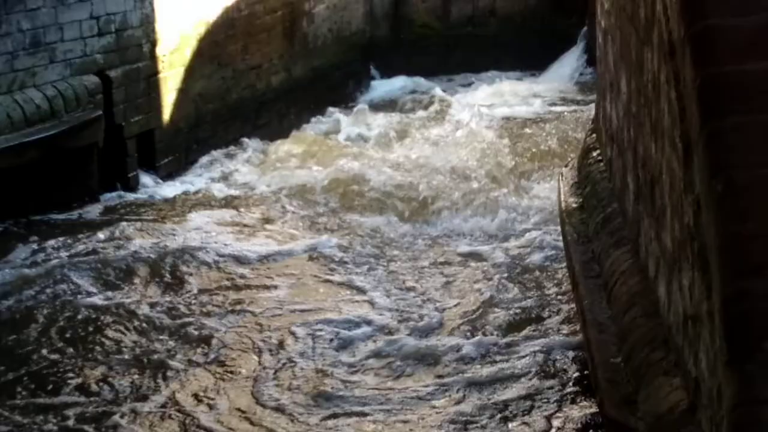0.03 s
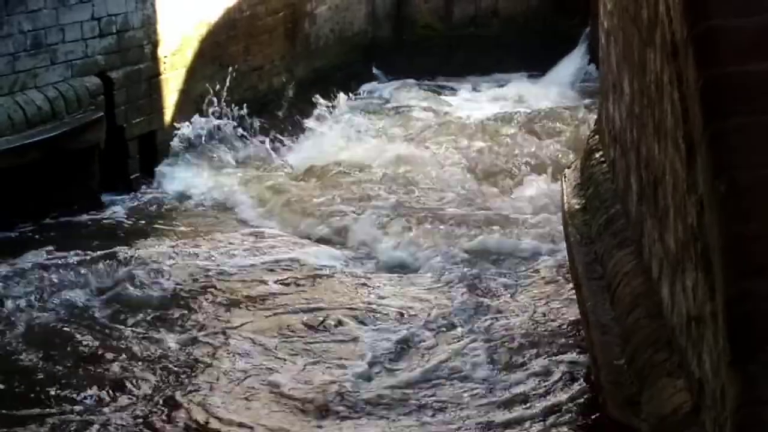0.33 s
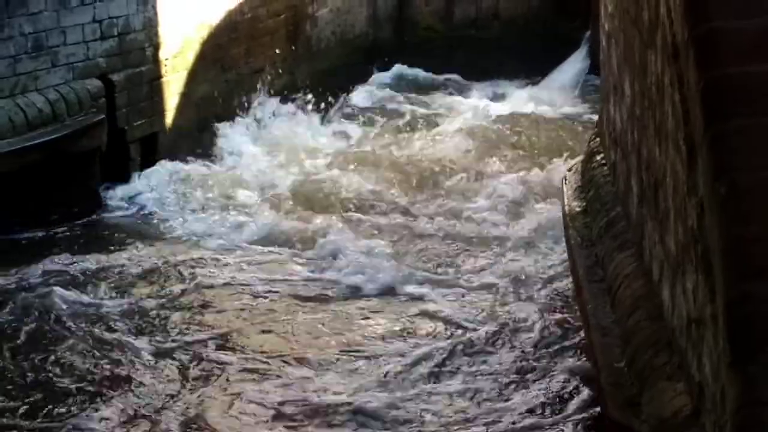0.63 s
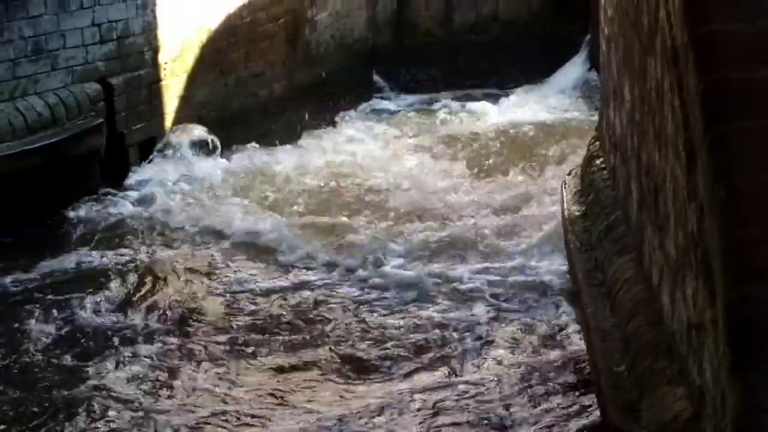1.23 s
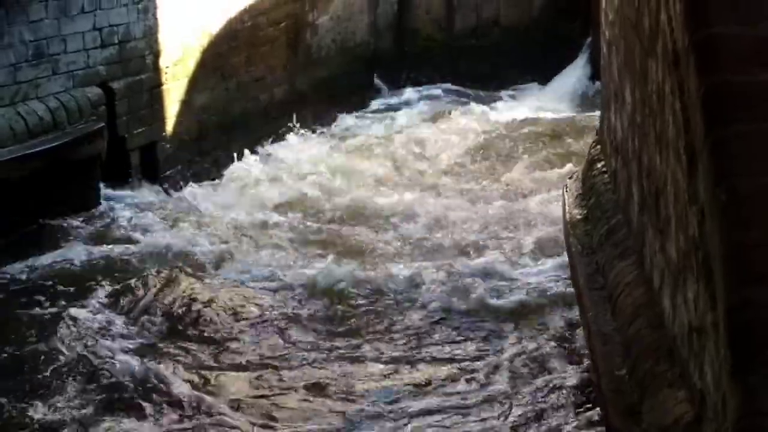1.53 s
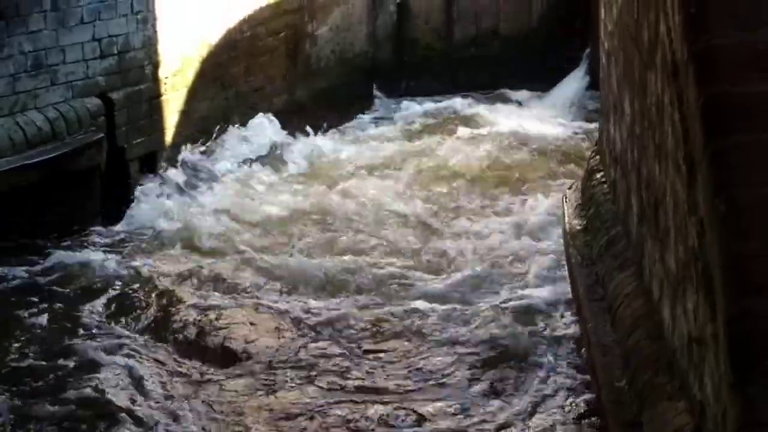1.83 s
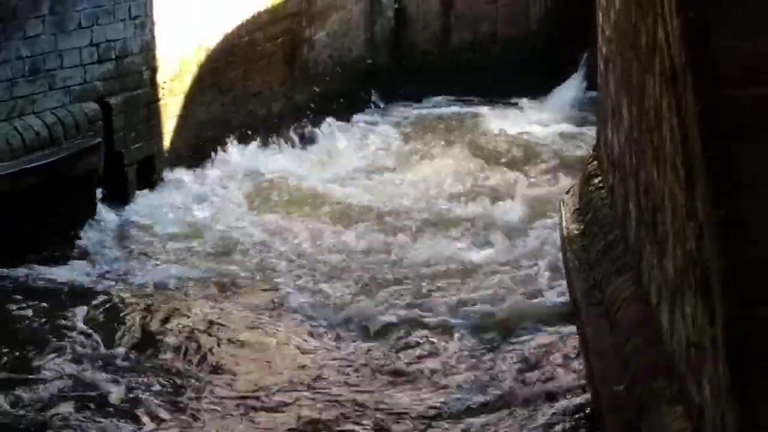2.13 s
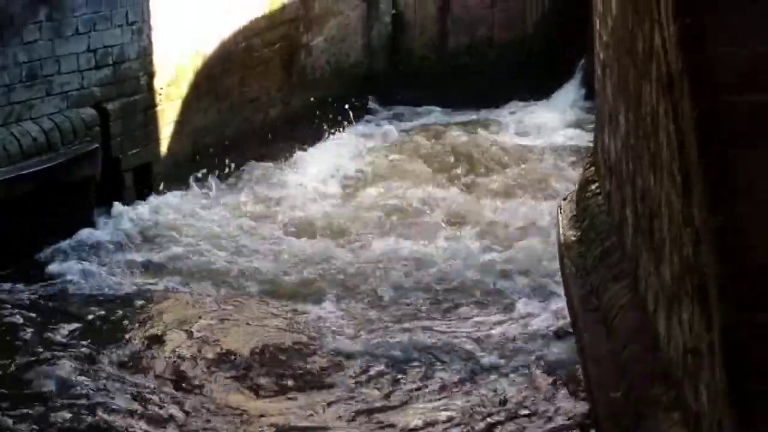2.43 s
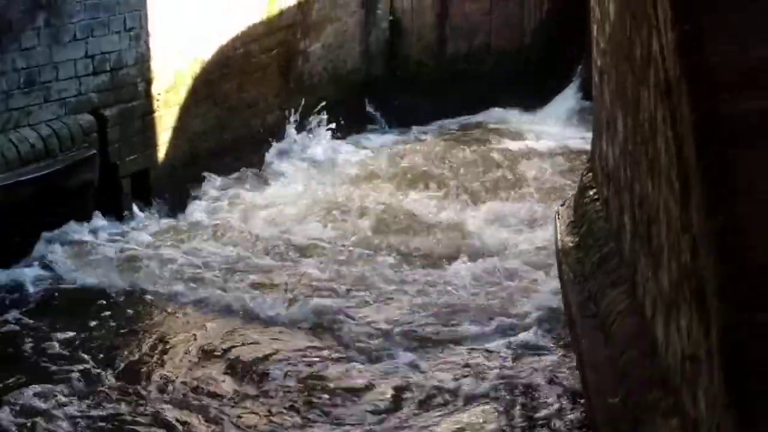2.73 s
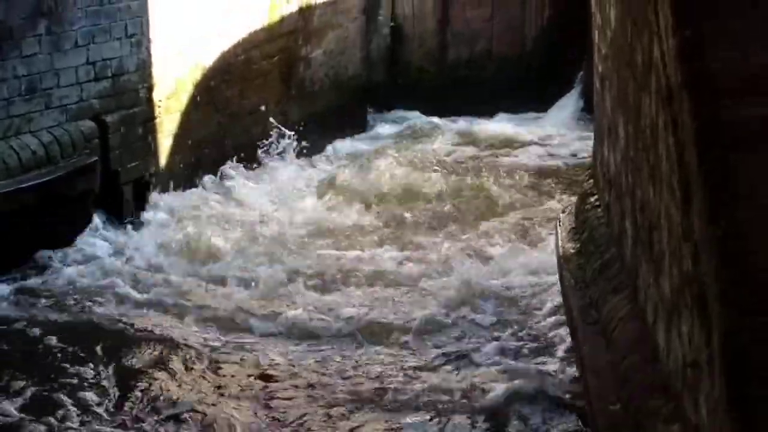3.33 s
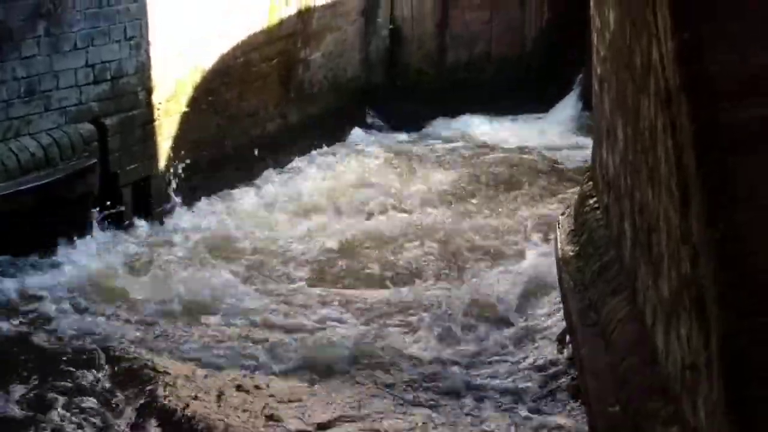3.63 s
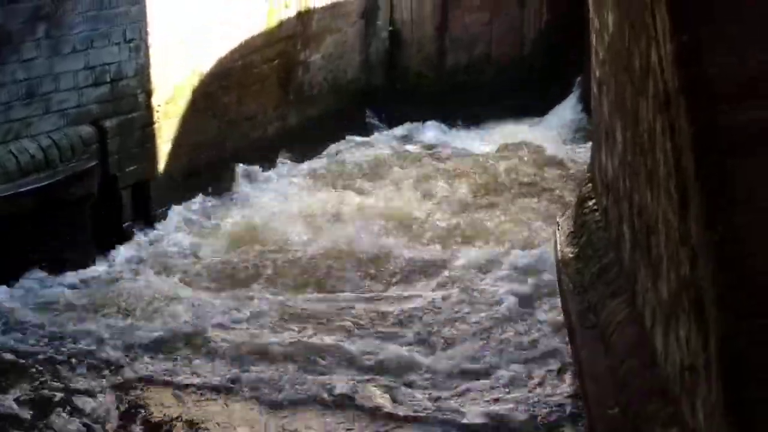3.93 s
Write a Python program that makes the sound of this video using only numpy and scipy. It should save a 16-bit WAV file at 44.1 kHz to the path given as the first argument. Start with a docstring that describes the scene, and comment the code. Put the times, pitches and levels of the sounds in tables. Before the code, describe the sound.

Turbulent water churns and roars steadily between narrow canal walls, gurgling and splashing.

```python
"""White water in a brick channel

Water surges steadily between narrow canal walls: a churning roar with ringing bubbles, a hollow boom,
gulps of swallowed air and spray from collapsing crests, over a faint low hum. The sound fades in.
Near the end a soft knock thuds in the widely spread pair of microphones."""
import sys
import numpy as np
from scipy import signal
from scipy.fft import rfft, irfft
from scipy.io import wavfile
from scipy.ndimage import uniform_filter1d

SR = 44100
rng = np.random.default_rng(int(sys.argv[2]) if len(sys.argv) > 2 else 0)


def output_pcm(signal):
    """Save a mono or channel-first signal as 16-bit PCM at the path in sys.argv[1].

    Samples are clipped to [-1, 1] before scaling.
    """
    pcm = np.clip(np.atleast_2d(signal).T, -1, 1) * 32767
    wavfile.write(sys.argv[1], SR, np.round(pcm).astype(np.int16))


N = 176400
T, HZ = np.arange(N) / SR, np.fft.rfftfreq(N, 1 / SR)

# water spectrum: f/Hz, relative density/dB, left minus right/dB
WATER_SPECTRUM = [(25, -82, -1.5), (36, -77, -0.7), (55, -71, -2.9), (90, -64.5, -14), (125, -63.5, 5),
                  (162, -53.5, -2.5), (243, -51, 0), (310, -53, -2), (457, -51, 0), (475, -51, 1),
                  (586, -52, 0), (764, -51, 0), (947, -51.5, 0.3), (1350, -55.5, -2), (1870, -56, -3.5),
                  (2140, -55, -2.5), (3110, -58, -0.2), (4230, -62, -1.5), (4900, -64.5, 2),
                  (5400, -65.5, -3.5), (5760, -67, 5), (6470, -64.5, -4.5), (7450, -66.5, 0.7),
                  (9700, -69, -2.5), (11270, -62.5, -3), (12700, -64, -6.5), (14000, -69.5, -2)]
# surge of the deep rumble: t/s, relative level/dB
RUMBLE_SURGE = [(.15, -29.5), (.48, -27.5), (.62, -26), (.74, -23), (.8, -27.5), (1.25, -32), (1.4, -24.5),
                (1.55, -30), (1.82, -28), (1.98, -26.5), (2.13, -25.5), (2.43, -25.5), (2.54, -27),
                (2.65, -26), (2.72, -26), (3.0, -26), (3.16, -28), (3.32, -29), (3.45, -29), (3.66, -25.5),
                (3.78, -27), (3.99, -25.5)]
# surge of the churn: t/s, relative level/dB
CHURN_SURGE = [(.35, -22), (.43, -23), (.65, -19.5), (.72, -20.5), (.77, -23.5), (.93, -22), (1.04, -22),
               (1.25, -21), (1.3, -23.5), (1.47, -19.8), (1.6, -21.5), (1.66, -24.5), (1.72, -21),
               (1.8, -23), (1.89, -21.5), (2.15, -21.5), (2.27, -21.5), (2.44, -23.5), (2.53, -21.5),
               (2.9, -20.5), (3.1, -21.5), (3.22, -23.5), (3.3, -22), (3.49, -23), (3.57, -22.5),
               (3.67, -22.5), (3.72, -23), (3.9, -22), (3.99, -20.5)]
# surge of the spray hiss: t/s, relative level/dB
SPRAY_SURGE = [(.35, -23), (.5, -21), (.66, -20), (.73, -21.5), (.77, -23.5), (1.05, -23.5), (1.24, -21),
               (1.31, -23.4), (1.42, -21.6), (1.58, -22), (1.79, -23), (2.0, -22), (2.2, -22), (2.72, -22),
               (2.81, -22.5), (2.92, -21), (3.22, -23), (3.29, -20.9), (3.52, -22), (3.6, -22), (3.7, -22),
               (3.85, -24.5), (3.95, -21.5), (3.99, -22)]
# surge of the boom between the walls: t/s, relative level/dB
BOOM_SURGE = [(.4, -30), (.8, -31), (1.02, -26.5), (1.28, -31.5), (1.45, -29), (2.1, -26), (2.42, -27),
              (2.9, -27.5), (3.3, -29), (3.55, -35.5), (3.95, -28)]
# likeness of the channels: f/Hz, depth/0..1, lean to one half of the water/-1..1
STEREO_LIKENESS = [(50, 0, 0.27), (120, 0.9, -0.28), (204, 0.7, 0.31), (248, 0.92, 0.18),
                   (308, 0.06, 0.091), (360, 0.6, -0.43), (600, 0.85, 0.49), (730, 0.78, 0.048),
                   (1020, 0.97, 0.27), (2364, 0.99, 0.68), (2880, 0.53, 0.48), (3360, 0.96, 0.44),
                   (4120, 0.2, -0.6), (4420, 0.93, -0.49), (4670, 1, -0.6), (4800, 1, -.5),
                   (5800, 0.85, -0.31), (7060, 0.83, 0.012), (7900, 0.4, -0.31), (10500, 0.3, .25),
                   (14000, 0, .35)]
# hum tones: f/Hz, level/dB, phase lead of left/rad
HUM_TONES = [(69.5, -51.5, 1), (104.6, -46.5, 1.36)]
# swallowed air pockets: peak t/s, starting f/Hz, peak level/dB
AIR_POCKETS = [(.651, 883, -19), (.705, 574, -22), (0.73, 202, -27), (0.737, 261, -28), (1.42, 1244, -25),
               (1.448, 648, -20.5), (1.682, 540, -17.5), (1.745, 568, -20.5), (1.902, 629, -19.5),
               (1.904, 887, -23), (1.989, 744, -23), (2.054, 609, -19.5), (2.069, 158, -20.5),
               (2.124, 274, -21), (2.136, 206, -27), (2.188, 166, -26), (2.226, 491, -19),
               (2.535, 248, -24.5), (2.547, 501, -20.5), (2.576, 616, -21.5), (2.689, 236, -25),
               (2.706, 390, -21), (2.768, 1334, -22), (2.887, 519, -18.5), (2.919, 510, -21.5),
               (3.312, 148, -25), (3.655, 590, -21), (3.663, 181, -22), (3.888, 480, -18.5),
               (3.927, 620, -21), (3.957, 270, -25), (3.96, 485, -21)]
# fade-in: t/s, linear gain
FADE_IN = [(.113, 0.012), (.12, 0.088), (.2, 0.3), (.25, 0.51), (.28, 0.72), (.35, 1)]

RUMBLE_TO_CHURN_HZ, CHURN_TO_SPRAY_HZ = (280, 480), (1400, 2800)
BAND_LIMIT_HZ = 14250


def amp(db):
    """Decibels to gain."""
    return 10 ** (np.asarray(db) / 20)


def unit_rms(x):
    """Scales to rms 1."""
    return x / np.sqrt(np.mean(x ** 2) + 1e-20)


def per_bin(table, column=1):
    """Table column at each FFT bin, log-frequency interpolation."""
    columns = np.transpose(table)
    return np.interp(np.log(HZ + 1), np.log(columns[0] + 1), columns[column])


def drift(shape, spans):
    """Smooth random field, rms 1; one smoothing span per axis."""
    field = rng.standard_normal(shape)
    for axis, span in enumerate(spans):
        field = uniform_filter1d(uniform_filter1d(field, span, axis), span, axis)
    return unit_rms(field)


def impulses(per_s, spread_db):
    """Two random trains sharing the rate; a few impulses stand out."""
    hits = rng.random((2, N)) < per_s / 2 / SR
    return hits * amp(spread_db * np.minimum(rng.exponential(1, (2, N)), 4))


def surge_db(t, curve):
    """Level curve about its mean."""
    times_s, db = np.transpose(curve)
    return np.interp(t, times_s, db - db.mean())


def water_colour(x, tilt=1):
    """Applies the water spectrum; rms 1."""
    return unit_rms(irfft(rfft(x) * amp(per_bin(WATER_SPECTRUM)) * tilt * (HZ < BAND_LIMIT_HZ), N))


def wall_echo(x, level_db=-3, t60_s=0.26, delay_s=.006):
    """Adds the short, dense echo between the channel walls."""
    t = T[:SR // 2]
    tail = rng.standard_normal((2, len(t))) * amp(-60 * t / t60_s) * (t > delay_s)
    tail /= np.linalg.norm(tail[0])
    return x + amp(level_db) * signal.fftconvolve(x, tail, axes=1)[:, :N]


def roar(level_db=-20, swell_db=0.34, flicker_db=.5, patch_db=0.75):
    """Turbulent water surges in three bands and churns in patches."""
    hz, t = np.fft.rfftfreq(512, 1 / SR), np.arange(N // 128 + 5) * 128 / SR
    shape = len(t), len(hz)
    churn_hz, spray_hz = CHURN_TO_SPRAY_HZ
    spray = np.clip(np.log((hz + 1) / churn_hz) / np.log(spray_hz / churn_hz), 0, 1)
    rumble = np.interp(hz, RUMBLE_TO_CHURN_HZ, [1, 0])
    bands = [(rumble, RUMBLE_SURGE), (1 - rumble - spray, CHURN_SURGE), (spray, SPRAY_SURGE)]
    db = sum(share * surge_db(t, curve)[:, None] for share, curve in bands)
    db += swell_db * drift((len(t), 1), (14, 1)) + flicker_db * drift(shape, (3, 50))
    db += patch_db * (1 - .5 * spray) * drift(shape, (14, 6))
    frames = (rng.standard_normal((2, *shape)) + 1j * rng.standard_normal((2, *shape))) * amp(db)
    _, noise = signal.istft(frames.transpose(0, 2, 1), nperseg=512, noverlap=384)
    return amp(level_db) * water_colour(noise[:, :N])


def bubbles(level_db=-25.5, per_s=1200, sizes=32, decay_cycles=7, glide=0.041):
    """Bubbles of many sizes ring briefly, rising in pitch."""
    out = np.zeros((2, N))
    for hz in np.linspace(300, 2400, sizes):
        age = T[:SR // 8] * hz * rng.uniform(0.94, 1.05) / decay_cycles  # in decay times
        ring = np.exp(-age) * np.sin(2 * np.pi * decay_cycles * age * (1 + glide * age))
        births = impulses(per_s / sizes, spread_db=2.5)
        out += signal.oaconvolve(births, unit_rms(ring)[None], axes=1)[:, :N]
    return amp(level_db + surge_db(T, CHURN_SURGE)) * water_colour(wall_echo(out))


def hollow_boom(level_db=-29, centre_hz=567.5, width_hz=166, wander_hz=17, swell_db=0.7):
    """The gap between the walls booms; its pitch wanders as the water heaves."""
    lowpass = 1 / (1 + (HZ / width_hz * 2) ** 4)
    heave = amp(swell_db * drift((N,), (1800,)) + surge_db(T, BOOM_SURGE))
    in_phase, quadrature = irfft(rfft(rng.standard_normal((2, 2, N)) * heave) * lowpass, N)
    phase = 2 * np.pi * np.cumsum(centre_hz + wander_hz * drift((N,), (2400,))) / SR
    return amp(level_db) * unit_rms(in_phase * np.cos(phase) + quadrature * np.sin(phase))


def splashes(level_db=-27, crests_per_s=36, drops_per_s=30000, decay_s=0.029, low_cut_hz=790):
    """Each collapsing crest throws a sudden shower of drops that dies away."""
    crest_power = impulses(crests_per_s, spread_db=2.5).sum(0) ** 2
    shower = signal.lfilter([1], [1, -np.exp(-1 / (decay_s * SR))], crest_power)
    shower /= uniform_filter1d(shower, size=14000) + 1e-6  # steady flow feeds the showers evenly
    drops = impulses(drops_per_s, spread_db=1.8) * rng.choice([-1, 1], (2, N)) * np.sqrt(shower)
    highpass = HZ ** 2 / (HZ ** 2 + low_cut_hz ** 2)
    return amp(level_db + surge_db(T, SPRAY_SURGE)) * water_colour(wall_echo(drops), highpass)


def stereo_spread(halves, comb_period_hz=2335):
    """The two halves of the water reach the channels with opposite phase shifts."""
    combed = HZ > comb_period_hz / 2  # here the channels swing in and out of phase along frequency
    comb_rad = 2 * np.pi * HZ / comb_period_hz
    correlation = per_bin(STEREO_LIKENESS) * np.where(combed, -np.cos(comb_rad), 1)
    turn = np.exp(.5j * np.arccos(np.clip(correlation, -1, 1)))
    lean = np.clip(per_bin(STEREO_LIKENESS, column=2) * np.where(combed, np.sin(comb_rad), 1), -1, 1)
    first, second = rfft(halves) * np.sqrt([(1 + lean) / 2, (1 - lean) / 2])
    pan = amp(per_bin(WATER_SPECTRUM, column=2) / 2)
    left = (first * turn + second / turn) * pan
    right = (first / turn + second * turn) / pan
    return irfft(np.array([left, right]), N)


def hum(waver=0.41, left_minus_right_db=-1):
    """Two low, wavering tones under the roar."""
    out = np.zeros((2, N))
    for hz, db, lead_rad in HUM_TONES:
        envelope = np.sqrt(2) * amp(db) * (1 + waver * drift((N,), (5000,)))
        phase = 2 * np.pi * (hz * T + rng.random())
        out += envelope * np.cos([phase + lead_rad, phase])
    return out * amp(np.array([[.5], [-.5]]) * left_minus_right_db)


def gulps(rise_s=0.00883, glide_per_s=0.85):
    """Air pockets go under and ring with rising pitch: large ones boom, small ones gurgle."""
    out, t = np.zeros(N), T[:SR // 5]
    envelope = t / rise_s * np.exp(1 - t / rise_s)
    for peak_s, hz, db in AIR_POCKETS:
        gulp = amp(db) * envelope * np.sin(2 * np.pi * hz * t * (1 + glide_per_s * t))
        start = round((peak_s - rise_s) * SR)
        out[start:start + len(gulp)] += gulp[:N - start]
    return out


def knock(at_s=3.472, width_s=.0012, peak_db=-15, bass_cut_hz=(59, 55)):
    """Soft knock on the microphones: a push of opposite sign in each, rung briefly by its bass cut."""
    push = np.exp(-.5 * ((T - at_s) / width_s) ** 2) + 1e-9
    bass_cuts = [signal.butter(6, hz, "high", fs=SR, output="sos") for hz in bass_cut_hz]
    left, right = (signal.sosfilt(sos, push) for sos in bass_cuts)
    return amp(peak_db) * np.array([left, -right]) / abs(left).max()


def scene():
    """Wide water, hum, centred gulps, one knock."""
    water = roar() + bubbles() + hollow_boom() + splashes()
    return stereo_spread(water) + hum() + gulps() + knock()


def record(dry):
    """Fade-in from silence, then band limit."""
    fade = np.interp(T, *np.transpose(FADE_IN)) * (T > FADE_IN[0][0])
    lowpass = signal.firwin(801, BAND_LIMIT_HZ, window=("kaiser", 9), fs=SR)
    return signal.oaconvolve(dry * fade, lowpass[None], "same")


dry = scene()
out = record(dry)
output_pcm(out)
```